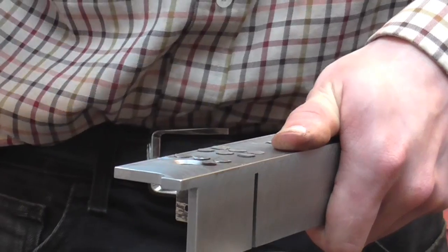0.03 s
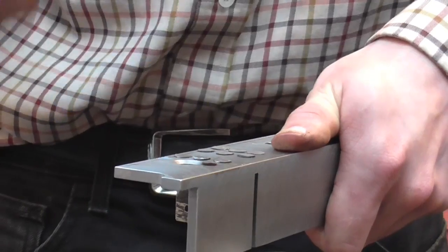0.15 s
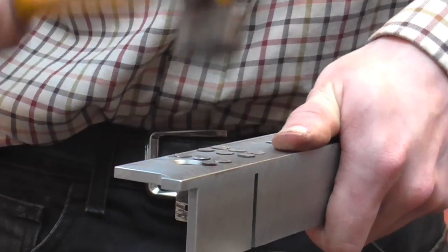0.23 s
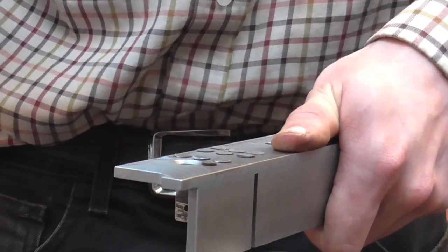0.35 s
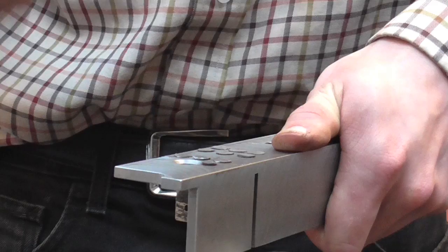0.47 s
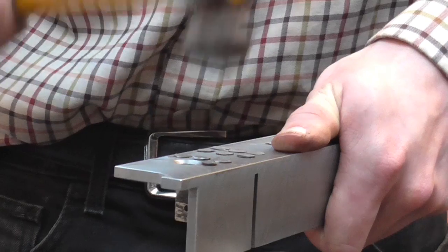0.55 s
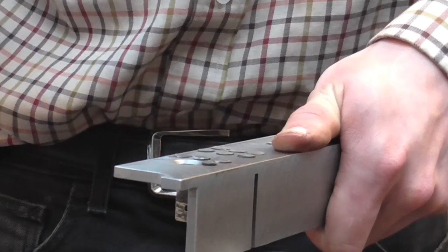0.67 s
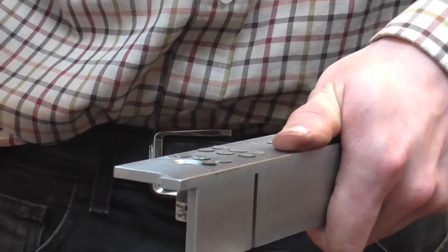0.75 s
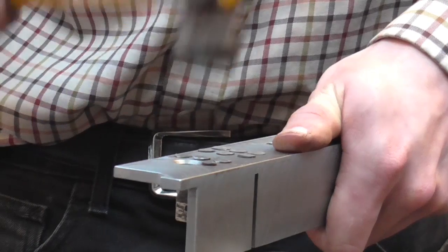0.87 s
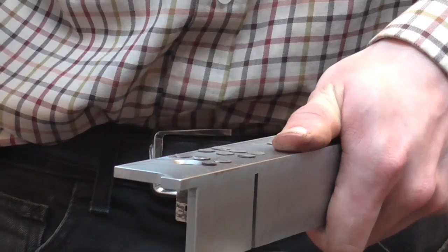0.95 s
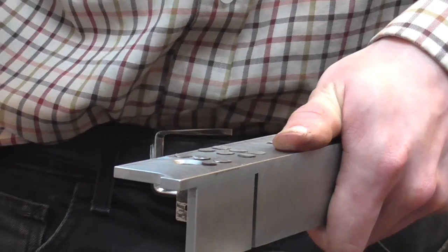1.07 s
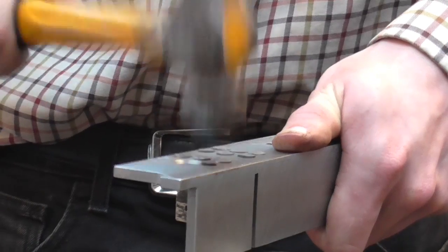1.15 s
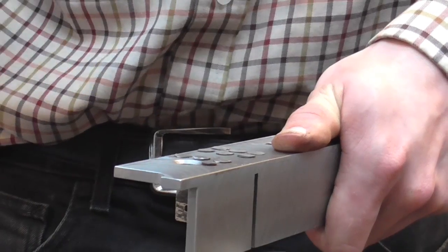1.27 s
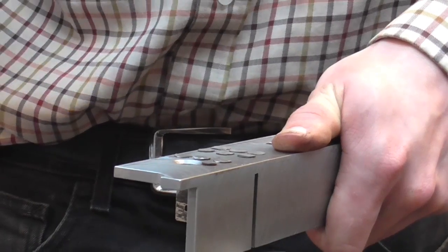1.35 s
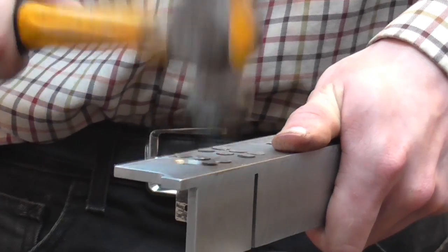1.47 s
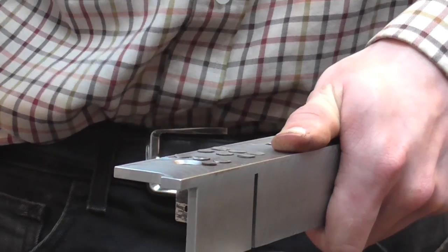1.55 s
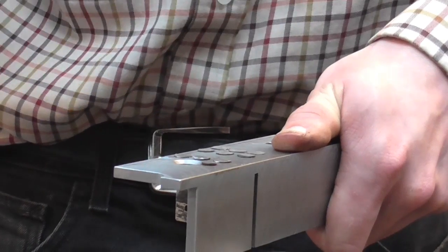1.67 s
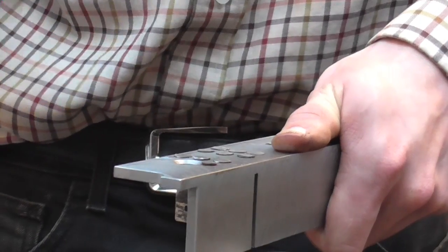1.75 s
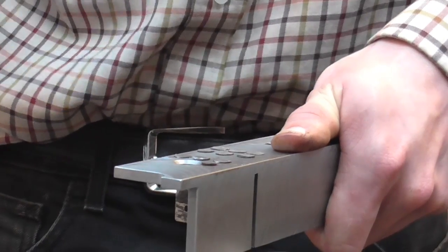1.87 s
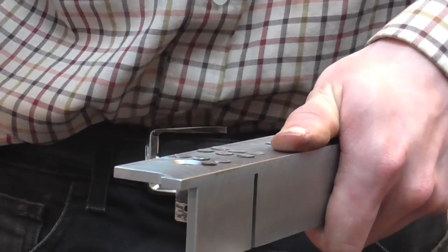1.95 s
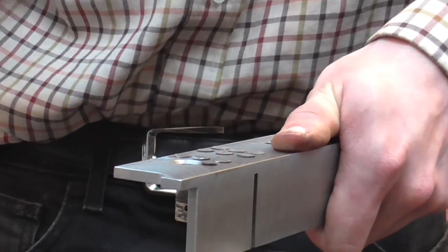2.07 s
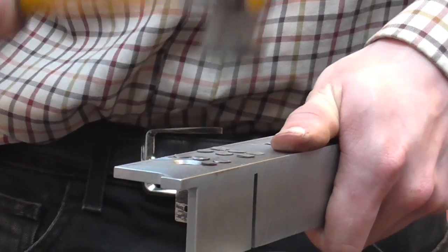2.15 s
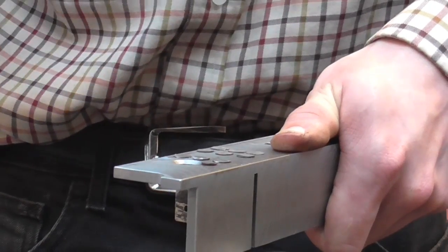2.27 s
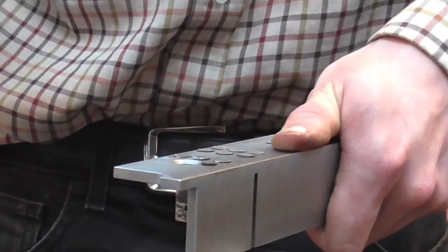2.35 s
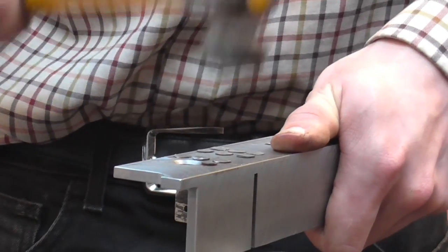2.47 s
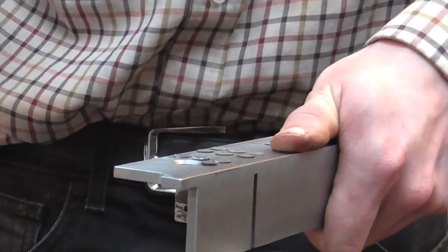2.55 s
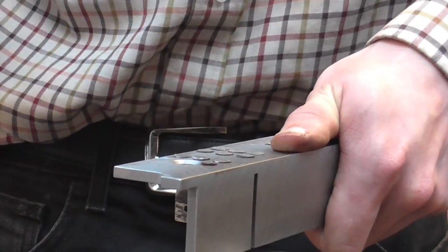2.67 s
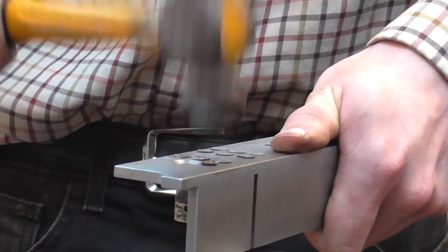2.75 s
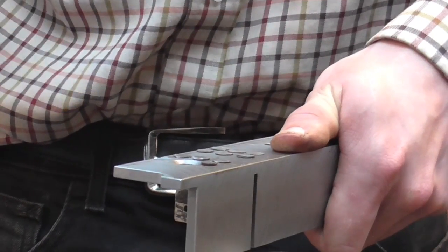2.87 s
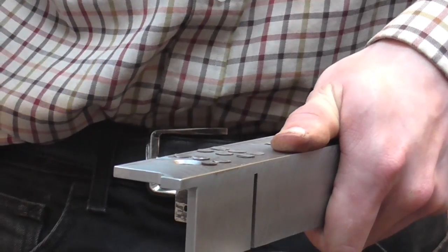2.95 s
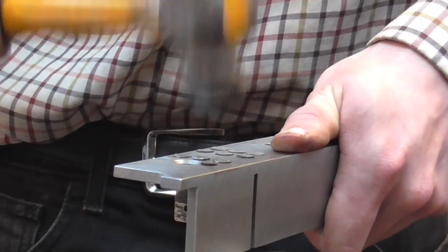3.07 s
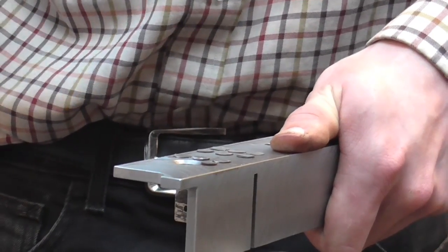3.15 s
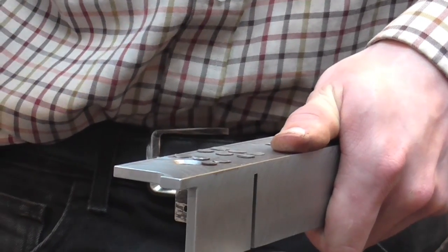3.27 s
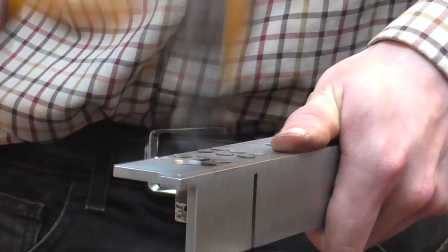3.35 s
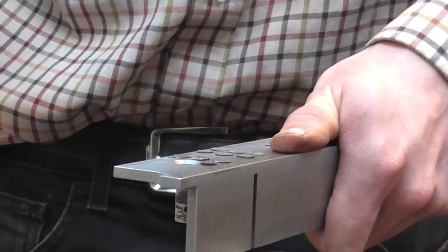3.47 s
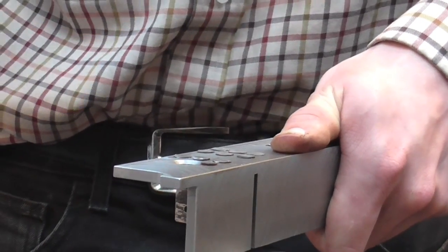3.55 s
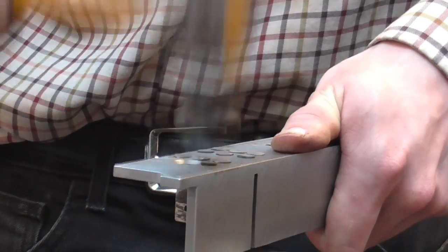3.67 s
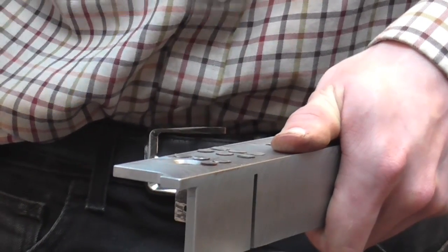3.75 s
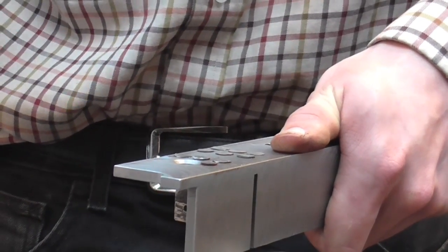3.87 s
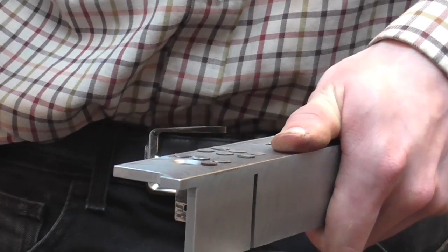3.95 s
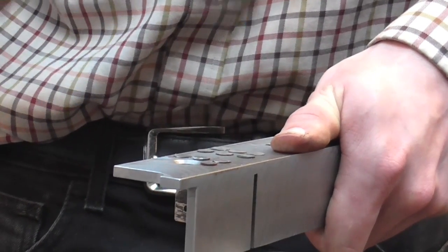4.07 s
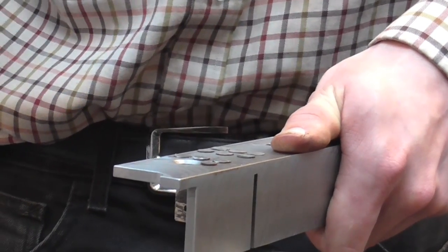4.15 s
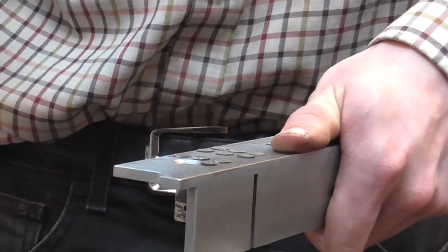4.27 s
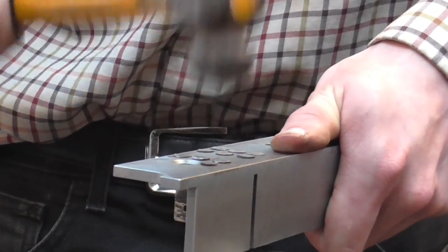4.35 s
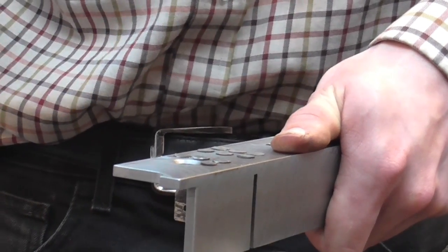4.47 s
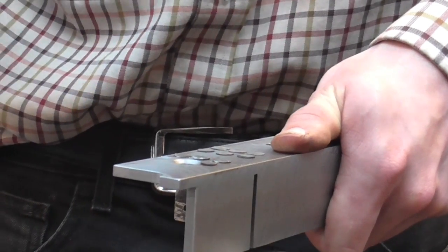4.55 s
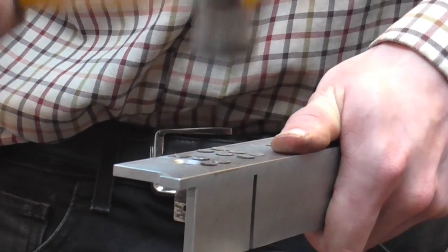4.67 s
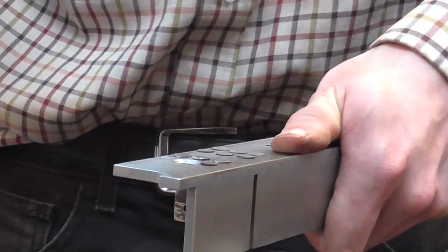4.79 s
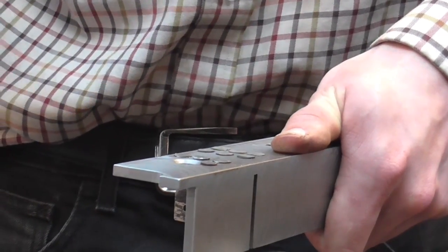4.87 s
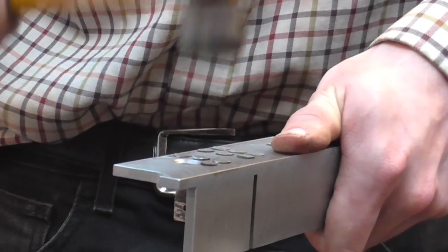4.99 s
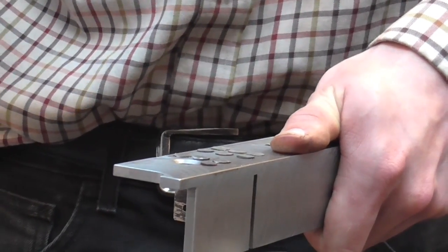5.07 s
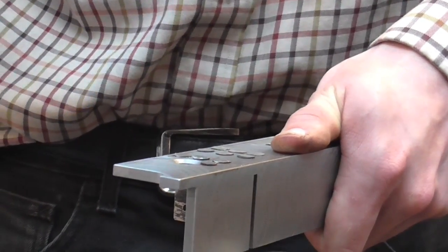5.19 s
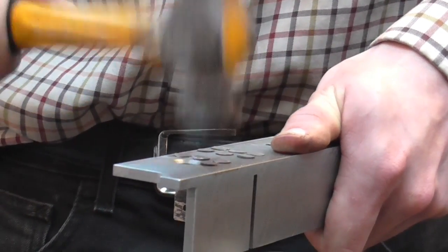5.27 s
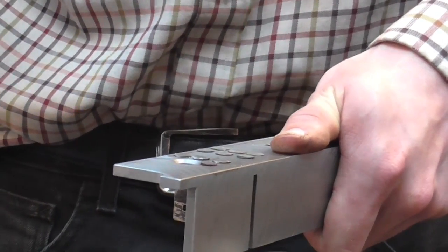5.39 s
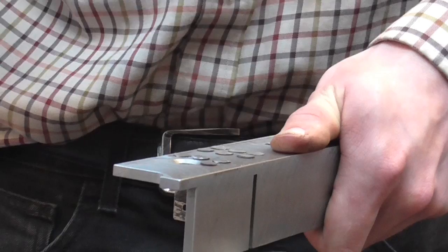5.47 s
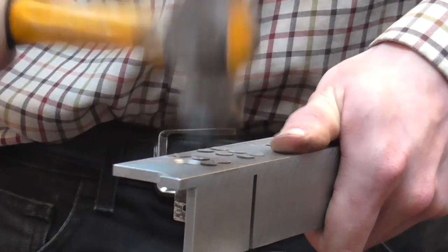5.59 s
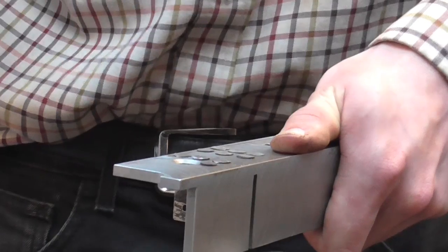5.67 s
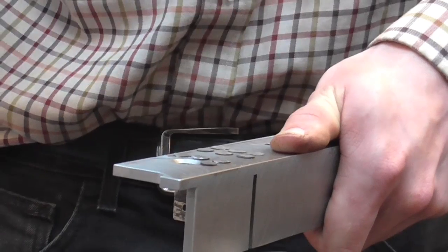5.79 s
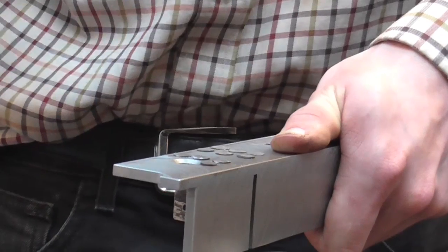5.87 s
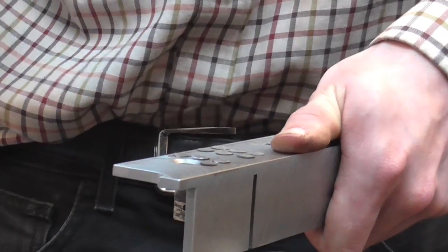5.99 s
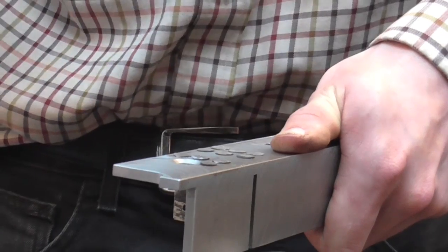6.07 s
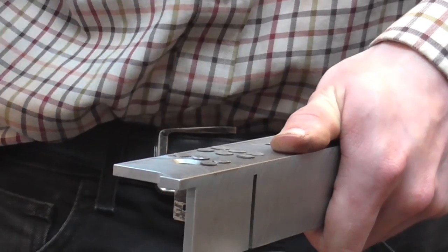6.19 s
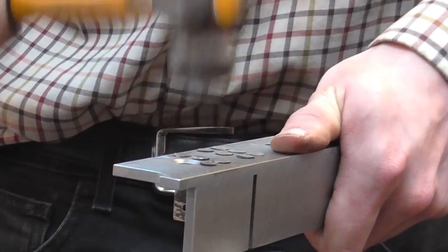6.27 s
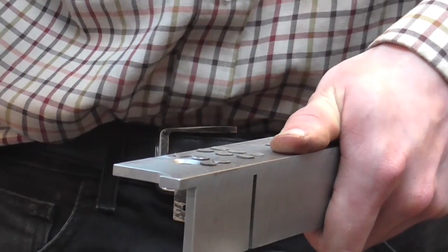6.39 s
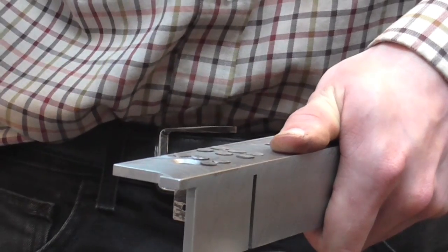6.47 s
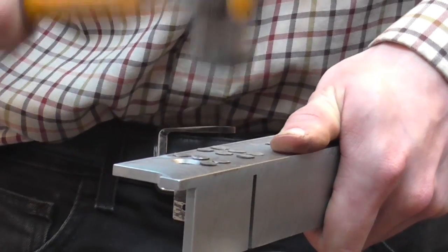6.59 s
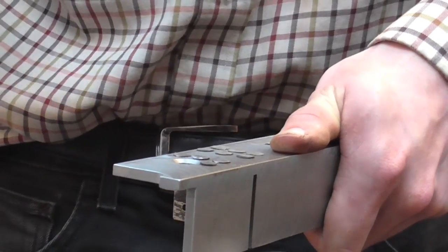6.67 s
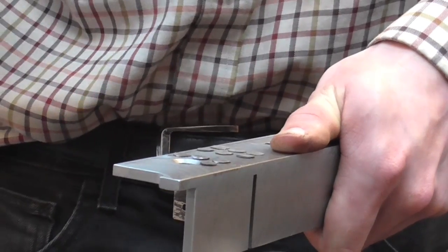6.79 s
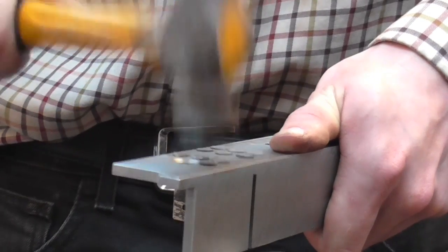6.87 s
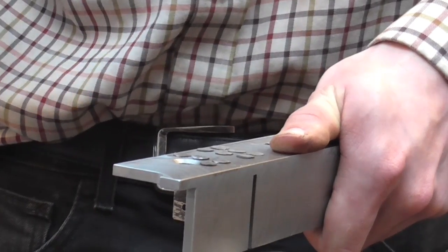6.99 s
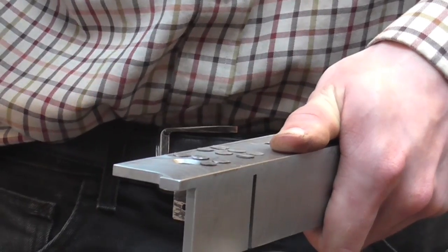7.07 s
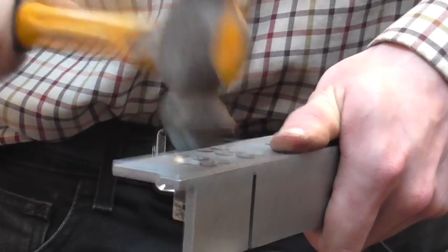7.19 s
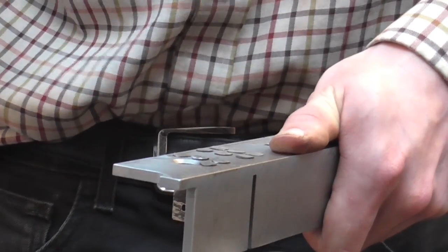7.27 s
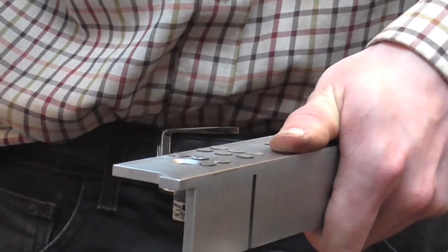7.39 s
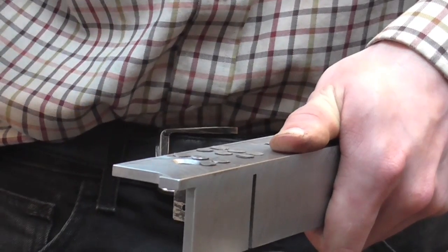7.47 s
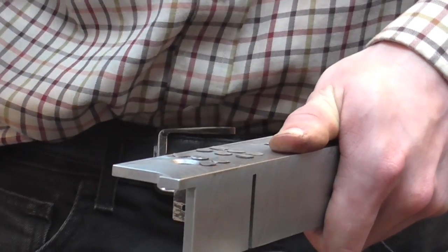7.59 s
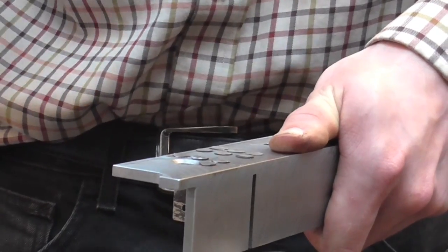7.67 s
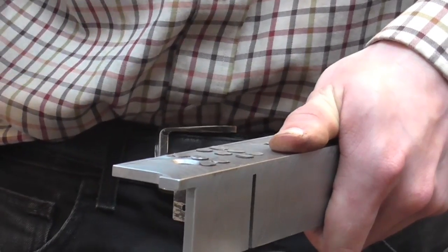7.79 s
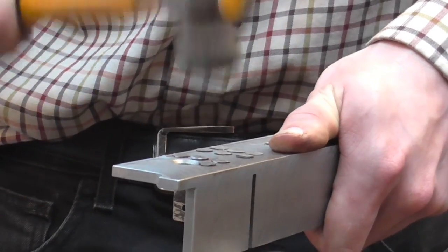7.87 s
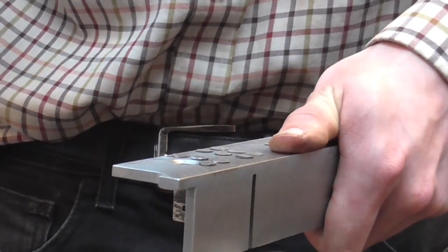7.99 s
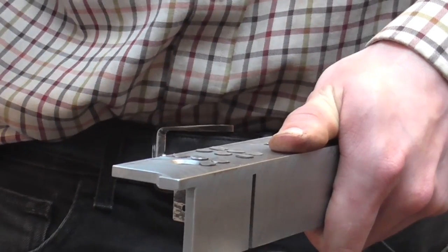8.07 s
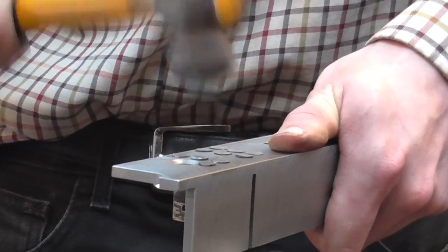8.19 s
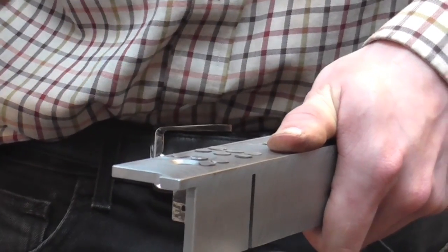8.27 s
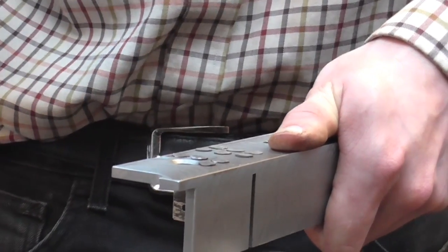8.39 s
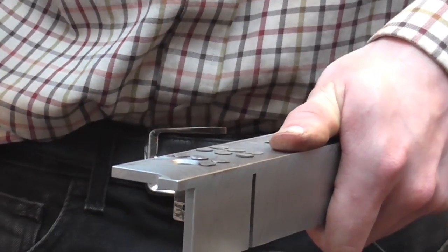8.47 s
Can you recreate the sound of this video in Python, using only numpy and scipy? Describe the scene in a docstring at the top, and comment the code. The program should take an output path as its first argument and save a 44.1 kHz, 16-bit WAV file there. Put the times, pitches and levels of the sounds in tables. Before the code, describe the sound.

From the very start, a small hammer strikes a rivet in a hand-held steel piece at an even pace of about three blows a second. Each blow is a hard, sharp clack followed by a brief metallic ring, damped by the hand, with a low thud of the bench underneath. The force stays nearly constant while the tone varies: glancing blows are duller, square ones brighter and slightly longer. The first second is on the dull side, a brighter run comes from about 4.7 to 6 seconds, and one clearly duller blow lands at 6.3 seconds. Between blows there are occasional tiny ticks from something loose and a barely audible sleeve rustle. The last blow falls at about 8.2 seconds, followed by a very faint brush of skin on steel. The hammer is close and nearly centred, in a small, dry, quiet workshop.

```python
"""A small hammer peens a rivet in a hand-held steel plane body, about three even blows a second.
Each blow is a hard clack, a brief ring of hand-damped steel and a thud of the bench in a small dry
workshop; the squarer it lands, the brighter and longer it rings. At the top of each swing the sleeve
rustles, and now and then something loose ticks faintly or the holding hand brushes the steel."""
import sys
import numpy as np
from scipy import signal
from scipy.fft import rfft, irfft, next_fast_len
from scipy.io import wavfile

SR = 44100
rng = np.random.default_rng(int(sys.argv[2]) if len(sys.argv) > 2 else 0)


def inscribe(sig):
    """Save sig as 16-bit PCM at rate SR to the path in sys.argv[1].

    A 1-D sig is mono; a 2-D sig holds one channel per row.
    Samples are clipped to [-1, 1] before scaling.
    """
    pcm = np.round(np.clip(np.atleast_2d(sig).T, -1, 1) * 32767)
    wavfile.write(sys.argv[1], SR, pcm.astype(np.int16))


N = 376613
T = np.arange(int(.6 * SR)) / SR  # seconds within one hit

# The hammer's rhythm. Each row: start in seconds, level in dB, squareness from -1 glancing to 1 dead on.
HAMMER_BLOWS = [(-0.072, -1, -0.75), (0.247, 1, -0.36), (0.569, 0.46, -0.37), (0.886, 0.2, -0.64),
                (1.209, 0.2, -0.083), (1.5257, 0.1, 0.056), (1.851, 0.1, -0.097), (2.1688, -1.5, -0.37),
                (2.4871, -0.9, -0.043), (2.803, -0.46, -0.18), (3.1158, -1, 0.33), (3.428, 0, -0.68),
                (3.7477, -0.8, 0.16), (4.0586, -0.3, -0.13), (4.3766, -0.4, -0.31), (4.6926, -1, 0.13),
                (5.0127, -0.74, 0.36), (5.3301, -1.5, 0.37), (5.6498, -1, 0.013), (5.9767, -1.5, 0.51),
                (6.2971, 0.5, -0.96), (6.624, -0.9, 0.33), (6.9328, 0.0, 0.14), (7.2544, -0.3, -0.44),
                (7.5854, -0.14, 0.39), (7.904, -0.84, 0.36), (8.226, -0.5, 0.22)]
# The crack of contact. Each row: frequency in Hz, level in dB.
CRACK_SPECTRUM = [(40, -35.5), (200, -11.5), (1000, 1), (3000, -10), (7000, -4), (11500, -16), (15500, -10)]
# The hammer head, the steel body, its high ping and the bench under it.
# Each row: pitch in Hz, level in dB, seconds to fall 60 dB.
HEAD_MODES = [(803, -14, 0.016), (1100, -20.5, 0.026), (3220, -17.5, 0.02), (4570, -5, 0.015),
              (6060, -9, 0.014), (7560, -19, 0.021), (9300, -21.5, 0.05), (10290, -18, 0.027)]
BODY_MODES = [(781, -27.5, 0.18), (803, -32.5, 0.18), (855, -33, 0.22), (948, -26.5, 0.18),
              (1170, -30, 0.19), (1298, -27.5, 0.18), (1367, -27.5, 0.16), (1412, -34, 0.2),
              (1473, -32.5, 0.2), (1633, -31, 0.13), (2121, -44, 0.3), (2217, -36, 0.15),
              (2606, -23.5, 0.12), (2882, -34, 0.13), (3565, -29, 0.17), (3620, -25, 0.16),
              (3706, -32, 0.22), (3871, -36, 0.14), (4575, -28.5, 0.14), (4678, -29, 0.16),
              (4737, -32, 0.22), (4783, -29, 0.2), (4950, -63, 0.55), (5720, -36, 0.2), (5785, -40, .2),
              (6494, -28, 0.13), (6910, -35, .2), (6990, -37.5, .18), (7547, -33.5, 0.14)]
PING_MODES = [(9140, -41.5, .19), (9265, -42.5, .2)]
BENCH_MODES = [(110, -46.5, 0.66), (141.2, -32, 0.14), (192.2, -19.5, 0.15), (237.5, -32, 0.18),
               (293.6, -31, 0.2), (321.7, -22, 0.14), (353, -32.5, 0.14), (417, -32.5, 0.11)]
# The clatter, a dense ringing of bench and workshop. Each row: frequency in Hz, level in dB.
CLATTER_SPECTRUM = [(30, -48.5), (75, -39.5), (112, -26.5), (135, -30), (190, -17), (330, -9), (620, -16.5),
                    (1300, -12), (2800, -18.5), (4400, -17.5), (7200, -19.5), (9500, -25), (11500, -29),
                    (15500, -29)]
# Its tail. Each row: frequency in Hz, seconds to fall 60 dB on an ordinary blow.
CLATTER_DECAY = [(60, 0.87), (110, 0.48), (200, 0.22), (500, 0.29), (1500, 0.21), (4500, 0.2), (8000, 0.18),
                 (14000, .15)]
# How much of it is new at each blow. Each row: frequency in Hz, share of the power from 0 to 1.
CLATTER_CHANGE = [(200, .15), (1500, 0), (5000, 0), (12000, 1)]
# Clusters of close steel modes that lift it. Each row: centre in Hz, width in Hz, boost in dB.
STEEL_CLUSTERS = [(3565, 250, 8), (4580, 440, 5), (5600, 110, 1.5), (7020, 1600, 3.5), (9150, 190, 2.5),
                  (10700, 140, 4)]
# Quiet workshop air. Each row: frequency in Hz, level in dB.
AIR_SPECTRUM = [(25, -20), (60, -10.5), (105, -3.5), (160, -10), (300, -7), (700, -19.5), (1300, -23.5),
                (2000, -31.5), (3000, -36.5), (5500, -37.5), (8000, -43), (11000, -44), (16000, -62)]
# Faint ticks between blows. Each row: start in seconds, level in dB.
LOOSE_TICKS = [(0.0948, -45), (0.4803, -40.5), (0.7944, -48.5), (1.731, -47.5), (3.0034, -54.5),
               (3.9535, -44.5), (4.2398, -42.5), (5.23, -46), (5.856, -45.5), (7.444, -43.5)]
# The loose part that ticks. Each row: pitch in Hz, level in dB, seconds to fall 60 dB.
LOOSE_MODES = [(5600, -5, 0.014), (7350, 5, 0.0035), (4800, -2.5, 0.007)]
# The hand sliding on the steel. Each row: centre in seconds, half length in seconds, level in dB.
HAND_SLIDES = [(0.182, .05, -86.5), (4.97, 0.13, -86), (8.53, 0.089, -72)]
# The hiss of skin on steel. Each row: frequency in Hz, level in dB.
SKIN_SPECTRUM = [(800, -15), (2100, -2.5), (3000, -12), (4500, -0.5), (5800, 0), (9000, -8), (15000, -12)]
# The stereo image. Each row: frequency in Hz, level of side against middle in dB.
STEREO_WIDTH = [(40, -2.5), (180, -18), (400, -12.5), (900, -9), (2000, -7.5), (4500, -10), (8000, -7),
                (13000, -6)]

CLANG_DB, SIZZLE_DB, PING_DB = 4.5, 5.5, 16  # boosts for a dead-on hit
RING_STRETCH = 0.12  # a dead-on hit lengthens the treble clatter by this share
HOLLOW_HZ, HOLLOW_UNTIL_S = 238, 1.7


def amp(db):
    """Decibels to gain."""
    return 10 ** (np.asarray(db) / 20)


def unit(x):
    """Scale to rms 1."""
    return x / np.sqrt(np.mean(x ** 2) + 1e-20)


def along(points, hz):
    """Read (Hz, value) points on a log frequency axis."""
    freqs, values = np.transpose(points)
    return np.interp(np.log(hz + 1), np.log(freqs + 1), values)


def filtered(x, response):
    """Equalise x with a gain that depends on frequency."""
    n = x.shape[-1]
    padded = next_fast_len(n + 8192)
    return irfft(rfft(x, padded) * response(np.fft.rfftfreq(padded, 1 / SR)), padded)[..., :n]


def noise(spectrum, size=len(T)):
    """Two unrelated coloured noises."""
    return filtered(rng.standard_normal((2, size)), lambda hz: amp(along(spectrum, hz)))


def spread(pair):
    """Two unrelated signals become the middle and the side of a stereo pair."""
    mid, side = pair[0], filtered(pair[1], lambda hz: amp(along(STEREO_WIDTH, hz)))
    return np.array([mid + side, mid - side])


def fade(t60):
    """A fall of 60 dB in t60 seconds; 1 - fade makes an attack."""
    return amp(-60 * T / t60)


def add(track, start_s, sound):
    """Mix a sound into the track."""
    start = round(start_s * SR)
    a, b = max(start, 0), min(start + sound.shape[-1], N)
    track[:, a:b] += sound[..., a - start:b - start]


def ring(modes, scatter_db, detune, phase=None):
    """Damped modes; strike point and grip shift their levels and pitches a little."""
    if phase is None:
        phase = np.zeros(len(modes))
    hz, db, t60 = np.transpose(modes)[:, :, None]
    level, shift = rng.standard_normal((2, len(modes), 1))
    envelopes = amp(db + scatter_db * level) * fade(t60)
    waves = envelopes * np.exp(2j * np.pi * hz * (1 + detune * shift) * T)
    return (np.exp(1j * phase) @ waves).imag


def clatter_tail(x, square):
    """Each frequency dies at its own speed; the treble goes first, sooner after a glancing hit."""
    hz, t, bands = signal.stft(x, SR, nperseg=256)
    treble = np.clip(hz / 5000, 0, 1)
    t60 = along(CLATTER_DECAY, hz) * (1 + RING_STRETCH * square * treble)
    damped = bands * amp(-60 * t / t60[:, None])
    return signal.istft(damped, SR, nperseg=256)[1][:, :len(T)]


def clatter(pattern, square):
    """Dense ringing: the same paths at every blow, plus a part that moves with the strike point."""
    share = lambda hz: along(CLATTER_CHANGE, hz)
    steady = filtered(pattern, lambda hz: np.sqrt(1 - share(hz)))
    fresh = filtered(noise(CLATTER_SPECTRUM), lambda hz: np.sqrt(share(hz)))
    clusters = lambda hz: sum(db * np.exp(-((hz - centre) / width) ** 2)
                              for centre, width, db in STEEL_CLUSTERS)
    # a square hit wakes the highest modes
    waking = lambda hz: square * along([(5000, 0.4), (9000, 0.83)], hz)
    shaped = filtered(steady + fresh, lambda hz: amp(waking(hz) + clusters(hz) * (1 + 0.45 * waking(hz))))
    return clatter_tail(shaped, square) * (1 - fade(0.003))


def hollow_note(start_s):
    """A hollow note of the bench swells after each of the first blows, fainter after the later ones."""
    db = -56 if start_s > HOLLOW_UNTIL_S else -45
    swell = np.exp(-((T - .115) / 0.05) ** 2)
    return amp(db) * np.sin(2 * np.pi * HOLLOW_HZ * T) * swell


def hammer():
    """Every blow: snap and crack of contact, ring of head and body, thud and clatter of the bench."""
    out = np.zeros((2, N))
    pattern = noise(CLATTER_SPECTRUM)
    # each mode has its own phase in middle and side
    body_phase = rng.uniform(0, 2 * np.pi, (2, len(BODY_MODES)))
    bench_phase = rng.uniform(0, 2 * np.pi, (2, len(BENCH_MODES)))
    for start, db, square in HAMMER_BLOWS:
        snap = amp(-6) * rng.standard_normal(len(T)) * fade(0.005)
        crack = noise(CRACK_SPECTRUM) * fade(0.023)
        head = ring(HEAD_MODES, scatter_db=2.5, detune=0.0099)
        body = amp(-1) * ring(BODY_MODES, scatter_db=1.8, detune=.0008, phase=body_phase)
        body *= 1 - fade(.011)
        ping = amp(PING_DB * square) * ring(PING_MODES, scatter_db=2, detune=.002)
        thud = amp(-0.5) * ring(BENCH_MODES, scatter_db=0.13, detune=0.0094, phase=bench_phase)
        thud *= 1 - fade(0.053)  # the heavy bench takes a few cycles to get moving
        centred = snap + head + ping + hollow_note(start)
        wide = spread(crack + body + thud + amp(2) * clatter(pattern, square))
        # every hit gets extra low end; a square one is bright, a glancing one duller
        colour = [(300, 2.72), (800, 0), (2300, 0), (4500, CLANG_DB * square), (9500, SIZZLE_DB * square)]
        blow = filtered(centred + wide, lambda hz: amp(along(colour, hz)))
        add(out, start, amp(db - 2.03) * blow * (1 - fade(0.0017)))
    # the blows carry little deep bass
    return signal.sosfilt(signal.butter(2, 120, "highpass", fs=SR, output="sos"), out)


def room_tone():
    """Still workshop air and a faint low hum."""
    air = amp(-67) * unit(spread(noise(AIR_SPECTRUM, size=N)))
    hum = amp(-73.5) * np.sin(2 * np.pi * 102 * np.arange(N) / SR)
    return air + hum


def loose_part():
    """Something loose gives a tiny bright tick with a thin echo."""
    out = np.zeros((2, N))
    for start, db in LOOSE_TICKS:
        tick = ring(LOOSE_MODES, scatter_db=1.5, detune=.012) * (1 - fade(.0015)) ** 2
        hiss = noise([(2500, -36.5), (4800, 2.5), (7500, 0.5), (11000, -32.5)])
        echo = amp(-32) * unit(spread(hiss)) * fade(.13)
        add(out, start + .001, amp(db) * (tick + echo))
    return out


def sleeve():
    """Cloth gives a soft, dull rustle as the arm turns at the top of each swing."""
    out = np.zeros((2, N))
    swell = np.exp(-((T - .032) / .014) ** 2)
    for start, *_ in HAMMER_BLOWS:
        late_s, db = rng.normal(0, [.004, 2.5])
        cloth = noise([(100, -2), (450, 8.5), (950, 0.5), (1700, -17), (4000, -51)])
        add(out, start + .2 + late_s, amp(db - 63) * unit(spread(cloth)) * swell)
    return out


def grip():
    """Skin brushes over the steel as the holding hand resettles."""
    t = np.arange(N) / SR
    strokes = sum(amp(db) * np.exp(-((t - centre) / half) ** 2) for centre, half, db in HAND_SLIDES)
    return strokes * unit(spread(noise(SKIN_SPECTRUM, size=N)))


def scene():
    """The hammer up front and a touch to the right, over the room and the small movements."""
    return hammer() * amp([[-.3], [.3]]) + room_tone() + loose_part() + sleeve() + grip()


def record(dry):
    """Soft clipping rounds the hardest peaks, then a steep low-pass trims the very top."""
    ceiling, top_hz = .62, 15900
    rounded = dry / (1 + np.abs(dry / ceiling) ** 4) ** (1 / 4)
    return filtered(rounded, lambda hz: 1 / (1 + (hz / top_hz) ** 90))


dry = scene()
out = record(dry)
inscribe(out)
```